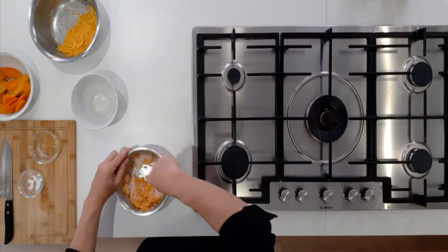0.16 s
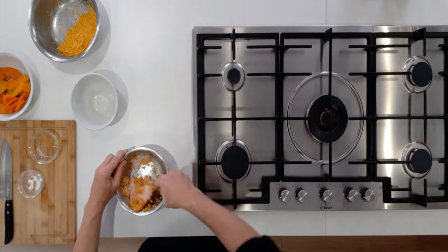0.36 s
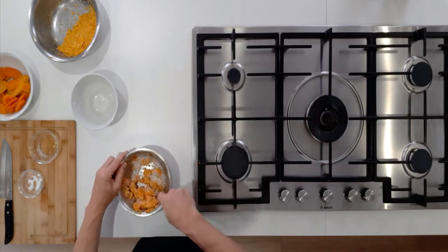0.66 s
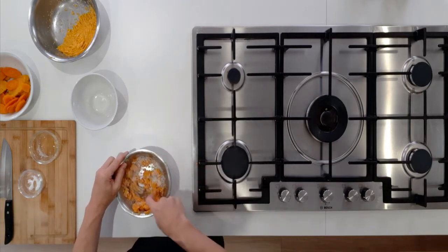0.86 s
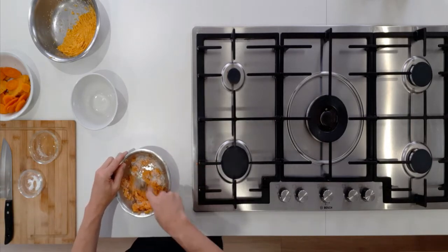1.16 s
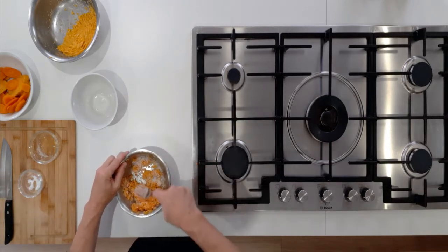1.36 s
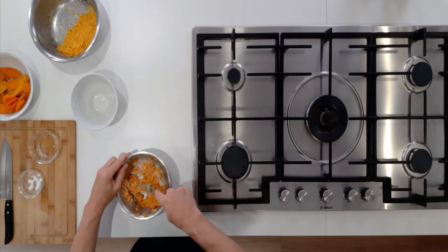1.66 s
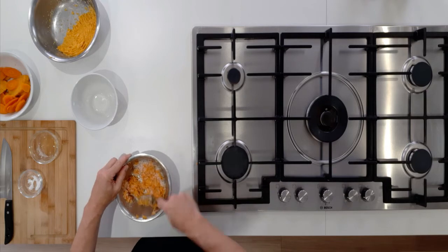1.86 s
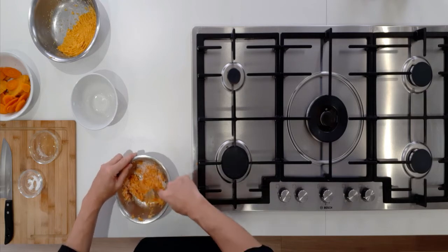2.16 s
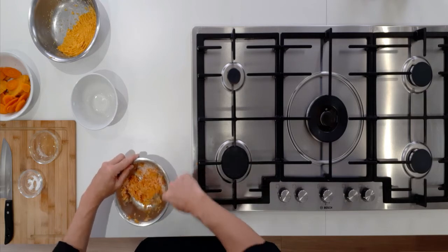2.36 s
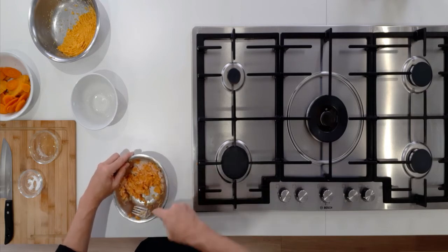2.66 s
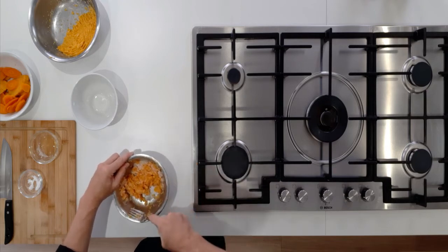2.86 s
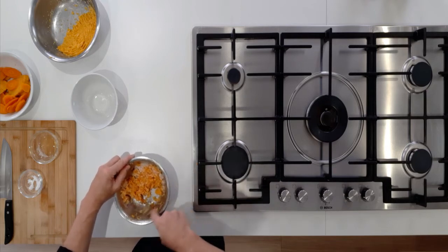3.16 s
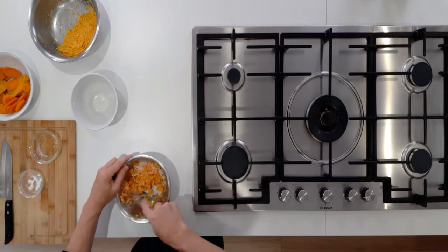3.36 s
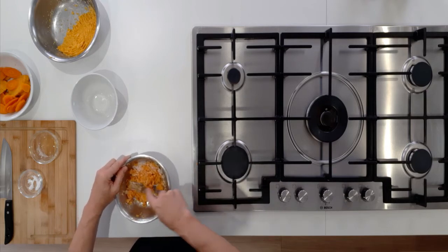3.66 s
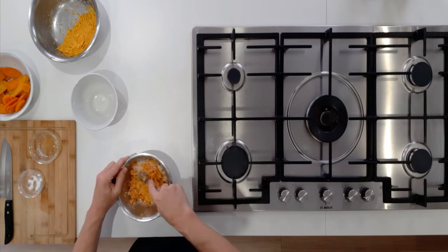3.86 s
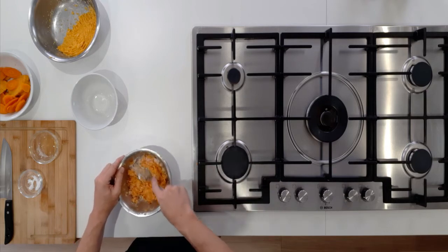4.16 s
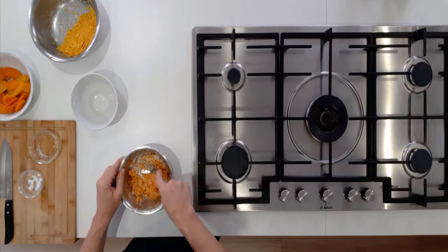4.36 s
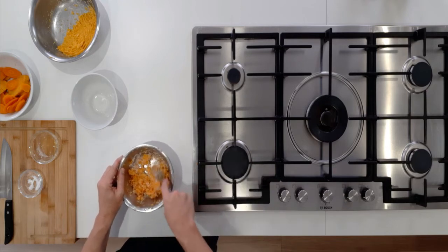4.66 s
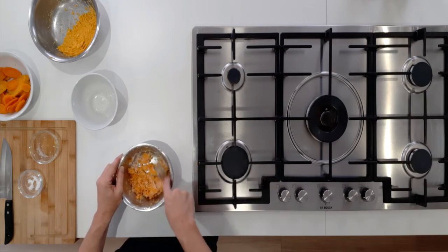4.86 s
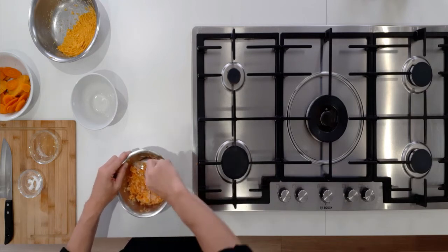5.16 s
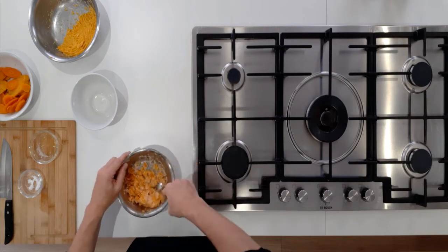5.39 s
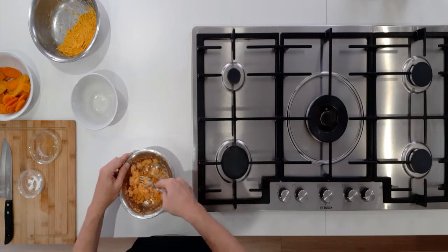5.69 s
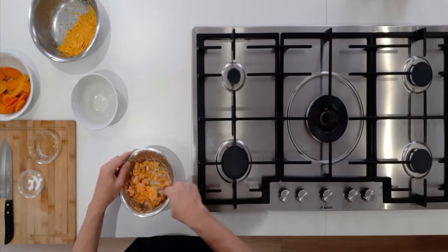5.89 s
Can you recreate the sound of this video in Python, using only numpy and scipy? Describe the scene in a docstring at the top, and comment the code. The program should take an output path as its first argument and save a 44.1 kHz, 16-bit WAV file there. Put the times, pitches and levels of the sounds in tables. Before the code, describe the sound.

Uneven clacks of a fork against a metal bowl as soft mash is mixed, with small wet smacks and light kitchen echo.

```python
"""A fork works soft vegetable mash in a hand-held steel bowl on the counter of a bare, live kitchen.
A faint rub leads into a hard knock on the wall, damped by mash and hand; the hardest comes at 2.1 s.
Lighter knocks follow, about four a second; the tines rub and squeak, the mash squelches and smacks.
Near 5.3 s come a quick cluster of knocks and a longer smear, at 5.9 s a last soft tap.
Throughout, the counter rumbles faintly and the room answers every knock."""
import sys
import numpy as np
from scipy import signal
from scipy.fft import rfft, irfft, next_fast_len
from scipy.io import wavfile
from scipy.ndimage import uniform_filter1d, minimum_filter1d

SR = 44100
rng = np.random.default_rng(int(sys.argv[2]) if len(sys.argv) > 2 else 0)


def output_pcm(signal):
    """Save a mono or channel-first signal as 16-bit PCM at the path in sys.argv[1].

    Samples are clipped to [-1, 1] before scaling.
    """
    pcm = np.clip(np.atleast_2d(signal).T, -1, 1) * 32767
    wavfile.write(sys.argv[1], SR, np.round(pcm).astype(np.int16))


N = 265781
T = np.arange(N) / SR

# fork blows: start_s, strength_db, thud_db, edge_db, tick_db, bare_steel_db, chatter_s, hollow_hz,
# hollow_db, clink1_hz, clink1_db, clink2_hz, clink2_db (hollow and clinks relative to the clack)
KNOCKS = [(0.167,1.5,-4.5,0,-12.5,-4,0.0011,376,-17.5,1678,-9.5,3130,-34),
          (.602,-22,6.5,-0.5,0.5,-3,0.00054,447,-6.5,1580,-7,7900,-13),
          (0.732,-34.5,-4,-0.5,-7,-14,.002,483,-23,1800,-2.5,5800,-25),
          (0.9245,-21.5,8.5,6,4,-4,0.00055,455,-4.5,6470,-32,2450,-11.5),
          (1.2136,-15,-4.5,-7.5,-10.5,-8.5,0.0004,425,-6.5,1600,-14,1310,-25),
          (1.577,-6,3,4,-12,-1,0.00099,448,-8.5,2990,-9,3755,-12),
          (1.8904,-12.5,5.5,4,-0.5,-2.5,0.00085,433,-6,910,-2,1233,-3),
          (1.916,-21.5,-9,-1,-6,-7,0.0042,474,-23,1580,-2,1216,-1),
          (2.129,4.5,-2,-1,-9,1,0.0032,439,-13.5,687,-14,3000,-15),
          (2.1362,-1,-4,3.5,-17.5,2,0.0025,410,-25,2996,-1,4150,-19),
          (2.3898,-8,13,2,2.5,-1.5,0.0021,445,-9.5,1090,-5,804,-19),
          (2.4361,-10.5,3,-4,-10,1,0.00069,467,-13.5,1590,-4.5,1080,-11),
          (2.9385,-33,-9,0.5,3,-6,0.00086,440,-11,2600,-5,10200,-4),
          (2.95,-22.5,2.5,-9,-3,2,0.0012,442,-8.5,3080,-1.5,2180,-7),
          (2.994,-23,-7.5,3,-10.5,1,0.0011,460,-18,2980,-3.5,2250,-4.5),
          (3.1898,-15.5,5,2,-3,-3,0.0017,433,-9,1340,-1,6200,-7),
          (3.2545,-12.5,-2,5.5,-5,-9.5,0.0017,457,-17,1764,-6,3330,-4.5),
          (3.4148,-16,4,-2,-6.5,-2,0.0032,410,-9.5,1066,-8,806,-25),
          (3.6713,-8,6,-1.5,-9,-5,0.004,396,-15,860,-11.5,2100,-13),
          (3.9489,-22,-2,-2.5,-6,-11,0.00028,452,-11,1610,-3,2980,-14),
          (4.17,-15.5,8.5,-5,-1,-4,0.00089,462,-4,934,-5.5,2160,-11),
          (4.4116,-15.5,5.5,-4.5,-4,-1.5,0.00017,469,-2.5,920,-1,637,-10),
          (4.6285,-13,11.5,3.5,1,-3.5,0.0013,453,-2.5,1040,-6.5,5710,-10),
          (4.851,-16,10,-1,-2.5,2,0.002,436,-7.5,735,-12.5,1090,-22),
          (4.9159,-24,1,3,-8.5,-3,0.00085,487,-15,1320,-13,3770,-17),
          (5.162,-28,-3,-1,-4.5,-1,0.0013,462,-10,7700,-3.5,8140,-4),
          (5.2972,-6.5,-6.5,-8,-13.5,-4.5,0.00026,456,-17,915,-2,1294,-4),
          (5.313,-22,-14,2,12,7,.0025,453,-20,1738,-13,5090,1),
          (5.334,-20.5,-1,-3,2,3,0.002,450,-14,1410,-2,4600,-3),
          (5.384,-20.5,8,-0.5,-6.5,0,0.0037,488,-10,960,-10,1520,-9),
          (5.925,-33.5,1.5,-5,-6,2.5,0.0037,510,-30,3150,0.5,1570,-8)]
# modes of the damped bowl: pitch_hz, level_db, t60_s
BOWL_MODES = [(676,-9.5,.025), (884,-4.5,0.074), (1065,-6,0.053), (1302,-2.5,0.025), (1507,4,0.034),
              (1695,1,0.034), (1838,-3,0.047), (2156,-12.5,0.051), (2423,-6.5,0.041), (2873,-12,0.039),
              (2914,-2,0.075), (3560,-7.5,0.065), (3560,-8.5,0.022), (4003,-9,0.052), (5084,-4.5,0.048),
              (5520,-6,0.018), (6080,-5.5,.05), (7160,-9,0.024), (7070,-13.5,0.036), (7870,-9,0.068),
              (9030,-5,0.017), (10100,-11.5,0.03), (10430,-5.5,0.021)]
# tines rubbing on steel: centre_s, half_length_s, level_db, resonance_hz
RUBS = [(.01, 0.028, -57, 1000), (0.084, 0.022, -66, 1190), (2.536, 0.007, -60, 1674),
        (4.854, 0.0025, -56, 1155), (5.089, 0.0066, -66, 950), (5.275, 0.024, -67, 1300),
        (5.321, 0.022, -66, 1100), (5.365, 0.058, -61, 1400), (5.671, 0.013, -72, 920),
        (5.73, 0.0043, -72, 950)]


def knocks(gain_db=-0.5, ring_db=1.0, hollow_t60_s=0.05, clink_t60_s=0.026):
    """Each blow: a clack, the bottom's hollow note and two wall clinks, tuned by spot and mash."""
    radiation = [(40, -36), (130, -15), (250, -8), (450, -11.5), (700, -10), (950, -11), (1700, -7),
                 (3300, -2), (6000, 1), (11000, 1.5)]  # a small bowl radiates little bass: freq_hz, gain_db
    out = np.zeros(N)
    for (start_s, strength_db, thud_db, edge_db, tick_db, bare_steel_db, chatter_s,
         hollow_hz, hollow_db, clink1_hz, clink1_db, clink2_hz, clink2_db) in KNOCKS:
        blow = clack(thud_db, edge_db, tick_db, ring_db + bare_steel_db, chatter_s)
        hollow = undb(hollow_db) * note(hollow_hz, hollow_t60_s)
        clink1 = undb(clink1_db) * note(clink1_hz, clink_t60_s)
        clink2 = undb(clink2_db) * note(clink2_hz, clink_t60_s)
        add(out, start_s, undb(strength_db + gain_db) * unit(blow + hollow - clink1 + clink2))
    return colour(out, radiation)


def clack(thud_db, edge_db, tick_db, ring_db, chatter_s, base_t60_s=0.021, scatter_db=2.0, size=16384):
    """Noisy part of a blow, energy 1: the tines land and chatter, all bowl modes answer."""
    dense_spectrum = [(30,-46), (100,-25.5), (190,-21), (270,-8), (400,-19), (540,1), (680,1), (950,1),
                      (1700,0), (2100,-2.5), (3500,-2), (4100,-7.5), (4550,-8), (6000,-4), (7800,-3),
                      (9200,-9.5), (10800,-5.5), (15500,-20.5)]  # dense, quickly damped modes of bowl and fork: freq_hz, gain_db
    t = T[:size]
    # uneven mash load splits each mode into a pair, differently at every blow
    hz, db, t60_s = np.repeat(BOWL_MODES, 2, axis=0).T
    scatter, load = rng.standard_normal((2, len(hz)))
    modes = np.cos(2 * np.pi * np.outer(hz * (1 + 0.012 * load), t)) * fade(t, t60_s[:, None])
    ring = (rng.choice([-1, 1], len(hz)) * undb(db + scatter_db * scatter)) @ modes
    dense_t60_s = base_t60_s * undb(0.35 * ring_db)  # more mash on the steel, shorter clack
    dense = flatten(rng.standard_normal(size) * fade(t, dense_t60_s), width_hz=230)
    response = unit(colour(dense, dense_spectrum)) + undb(ring_db) * unit(ring)
    chatter = unit(rng.standard_normal(size) ** 3 * np.exp(-t / chatter_s))
    chatter = unit(colour(chatter, [(300, -17.5), (2000, 14.5)]))
    contact = flatten(signal.unit_impulse(size) + undb(-1) * chatter, width_hz=320)
    blow = signal.fftconvolve(contact, response)[:size]
    # mash under the tines thuds, bare steel ticks
    return unit(colour(blow, [(840, thud_db), (1610, 0), (2470, edge_db), (6070, tick_db)]))


def pings(split=0.01, t60_s=0.16):
    """Steel free of hand and mash rings longer, in close mode pairs that beat."""
    free_modes = [(1.577, 5170, -34), (2.1293, 5180, -22), (2.13, 4050, -16.5), (2.1293, 3490, -17.5),
                  (2.389, 6050, -29), (2.995, 5130, -47.5), (3.1894, 10450, -40), (4.6267, 5440, -36),
                  (4.855, 5840, -35), (5.2975, 3020, -29)]  # ringing after a blow: start_s, pitch_hz, level_db
    out = np.zeros(N)
    for start_s, hz, db in free_modes:
        add(out, start_s, undb(db) * unit(note(hz, t60_s) + note(hz * (1 + split), t60_s)))
    return out


def rubs(slips_per_s=6000, broad_db=-18, steel_db=-12, q=1.77, gain_db=1.0):
    """Uneven tine slips drive the wall near one resonance and ring the bowl modes."""
    slip_hz_db = [(40, -36.5), (150, 1), (400, -9.5), (1600, -18.5), (3000, -4), (5000, 0.5),
                  (14000, 2.5)]
    slips = steady(grains(slips_per_s, spread_db=1.5), slip_hz_db)
    steel = np.zeros(N)
    for hz, db, t60_s in BOWL_MODES:
        mode_q = np.pi * hz * t60_s / np.log(1000)
        steel += undb(db) * t60_s * signal.lfilter(*signal.iirpeak(hz, mode_q, SR), slips)
    steel = unit_rms(steel)
    out = np.zeros(N)
    for centre_s, half_s, db, hz in RUBS:
        peak = signal.iirpeak(hz, q, SR)
        wall = unit_rms(signal.lfilter(*peak, signal.lfilter(*peak, slips)))
        friction = wall + undb(broad_db) * slips + undb(steel_db) * steel
        out += undb(db + gain_db) * swell(centre_s, half_s) * friction
    return out


def squeaks(jitter=0.51, overtone_db=-22, grip_db=4):
    """A tine briefly sticks and slips almost regularly, with uneven grip."""
    glides = [(2.432, 0.023, 1603, 1656, -54.5), (4.186, 0.014, 1575, 1880, -51.5),
              (4.857, 0.0246, 1302, 1778, -52.5)]  # tine squeaks: start_s, length_s, start_hz, end_hz, level_db
    out = np.zeros(N)
    grip = undb(grip_db * wander(per_s=400))
    for start_s, length_s, start_hz, end_hz, db in glides:
        n = int(length_s * SR)
        hz = np.linspace(start_hz, end_hz, n) * (1 + jitter * rng.standard_normal(n))
        phase = 2 * np.pi * np.cumsum(hz) / SR
        tone = np.sin(phase) + undb(overtone_db) * np.sin(2 * phase)
        add(out, start_s, undb(db) * signal.windows.tukey(n, 0.5) * tone)
    return out * grip


def squelches(pops_per_s=1800, gain_db=-2.5, smear_db=-11, stir_db=-86, patchy_db=4):
    """Mash crackles and smears under the fork, and faintly between presses."""
    presses = [(0.03, 0.016, -65.5, 5530), (0.535, 0.005, -73, 7600), (0.752, 0.0074, -71.5, 4540),
               (0.996, 0.0062, -62, 5600), (2.425, 0.031, -67, 7200), (2.519, 0.0079, -58, 3322),
               (2.541, 0.0092, -59.5, 7050), (3.255, 0.032, -63, 8980), (3.449, 0.012, -63.5, 8400),
               (4.035, 0.009, -65, 7140), (4.254, 0.0073, -60, 3270), (4.291, 0.0045, -66.5, 3380),
               (4.946, 0.016, -62.5, 7000), (5.314, 0.081, -64, 10300), (5.335, 0.023, -64, 6150),
               (5.517, 0.014, -63.5, 7100), (5.687, 0.032, -76.5, 11400), (5.939, 0.018, -76, 3360),
               (5.945, 0.0055, -63, 8800)]  # mash pressed and torn: centre_s, half_length_s, level_db, pop_hz
    smear_spectrum = [(300, 2.5), (1200, 17), (2300, 7.5), (3400, 7), (4600, -20.5), (7800, -21),
                      (12500, -22), (15500, -47)]  # smearing mash: freq_hz, gain_db
    out = np.zeros(N)
    pressure = undb(stir_db + patchy_db * wander(per_s=30))
    for centre_s, half_s, db, hz in presses:
        n = int(6 * half_s * SR)
        burst = pops(n, hz, int(pops_per_s * n / SR)) * signal.windows.gaussian(n, half_s * SR)
        add(out, centre_s - n / SR / 2, undb(db + gain_db) * burst)
        pressure += undb(db + smear_db) * swell(centre_s, half_s)
    return out + pressure * steady(grains(per_s=8000, spread_db=2.5), smear_spectrum)


def pops(n, typical_hz, count, cycles=6, glide=0.046, spread_db=5, pitch_spread=0.23):
    """Tiny wet pockets burst within n samples, each a short rising ping; rms 1."""
    starts = rng.integers(0, n, (count, 1))
    pitch, level = rng.standard_normal((2, count, 1))
    hz = np.clip(typical_hz * np.exp(pitch_spread * pitch), 800, 14000)
    age = T[:256] * hz / cycles  # in decay times
    phase = 2 * np.pi * cycles * age * (1 + glide * (1 - np.exp(-age)))
    pockets = undb(spread_db * level) * np.sqrt(hz) * np.exp(-age) * np.sin(phase)
    places = starts + np.arange(age.shape[1])
    return unit_rms(np.bincount(places.ravel(), pockets.ravel(), n)[:n])


def smacks(t60_s=0.012, size=2048):
    """Wet mash lets go of the steel with a short, bright tick."""
    releases = [(0.186, -34), (2.545, -37.5), (4.0255, -46), (4.0422, -36.5), (4.957, -37), (5.5111, -44),
                (5.549, -41)]  # mash pulling off: start_s, level_db
    tick_spectrum = [(300, -31), (2000, -12), (5000, -8), (7500, -1), (11000, -5.5), (15500, -5)]  # wet tick: freq_hz, gain_db
    out = np.zeros(N)
    for start_s, db in releases:
        burst = rng.standard_normal(size) * fade(T[:size], t60_s)
        add(out, start_s, undb(db) * unit(colour(burst, tick_spectrum)))
    return out


def kitchen(x, build_s=0.014, gap_s=0.0022):
    """Diffuse echo that builds after a short gap; the treble dies first."""
    bands = [(130, 0.95, 12), (270, 0.9, 15), (400, 0.58, 10), (918, 0.58, 6.5), (1526, 0.55, 2.5),
             (2890, 0.58, -4), (7000, 0.52, -6), (14500, 0.39, -4.5)]  # room echo: freq_hz, t60_s, level_db (relative to the direct sound)
    t = T[:SR]
    hz, t60_s, db = np.transpose(bands)
    log_hz = np.log(np.maximum(np.fft.rfftfreq(SR, 1 / SR), 1))
    onset = 1 - np.exp(-np.maximum(t - gap_s, 0) / build_s)
    median_decay = fade(t, np.median(t60_s))
    # many walls and cupboards: no favoured note
    reflections = flatten(rng.standard_normal(SR) * onset * median_decay, width_hz=16)
    undamped = rfft(unit(reflections) / median_decay * np.linalg.norm(onset * median_decay))
    echo = np.zeros(SR)
    for band, band_t60_s, band_db in zip(np.eye(len(hz)), t60_s, db):
        tail = fade(t, band_t60_s) / np.linalg.norm(onset * fade(t, band_t60_s))
        echo += undb(band_db) * tail * irfft(undamped * np.interp(log_hz, np.log(hz), band), SR)
    return signal.oaconvolve(x, echo)[:N]


def counter_rumble(knock_db=-66, db_per_db=0.69, attack_s=0.02, t60_s=0.71, rub_db=-19, hands_db=-88):
    """Knocks and rubs shake the counter; the hands keep up a faint rumble and shift the bowl."""
    shifts = [(1.34, 0.027, -76), (4.072, 0.045, -79)]  # bowl shifting on the counter: centre_s, half_length_s, level_db
    rumble_spectrum = [(25, -19), (60, 11.5), (110, 10.5), (180, 12), (400, -20.5), (1500, -66.5)]  # shaken counter: freq_hz, gain_db
    shake = (1 - np.exp(-T / attack_s)) * fade(T, t60_s)
    shake_power = np.zeros(N)
    for start_s, strength_db, *_ in KNOCKS:
        add(shake_power, start_s, (undb(knock_db + db_per_db * strength_db) * shake) ** 2)
    drag = sum(undb(db + rub_db) * swell(centre_s, half_s) for centre_s, half_s, db, _ in RUBS)
    hands = undb(hands_db + 4 * wander(per_s=48))
    hands += sum(undb(db) * swell(centre_s, half_s) for centre_s, half_s, db in shifts)
    return np.sqrt(shake_power + drag ** 2 + hands ** 2) * steady(rng.standard_normal(N), rumble_spectrum)


def room_air(level_db=-82):
    """Faint, steady hiss of the room."""
    air_spectrum = [(30, -16.5), (200, -4.5), (1000, -5), (4000, -17), (15000, -19)]  # room noise: freq_hz, gain_db
    return undb(level_db) * steady(rng.standard_normal(N), air_spectrum)


def undb(db):
    return 10 ** (np.asarray(db) / 20)


def unit(x):
    """Scale to energy 1."""
    return x / np.sqrt(np.sum(x ** 2) + 1e-30)


def unit_rms(x):
    return unit(x) * np.sqrt(len(x))


def fade(t, t60_s):
    return np.exp(-np.log(1000) * t / t60_s)


def swell(centre_s, half_s):
    return np.exp(-0.5 * ((T - centre_s) / half_s) ** 2)


def add(out, start_s, x):
    i = max(int(start_s * SR), 0)
    out[i:i + len(x)] += x[:max(N - i, 0)]


def note(hz, t60_s, size=16384):
    """One struck mode, energy 1."""
    return unit(np.sin(2 * np.pi * hz * T[:size]) * fade(T[:size], t60_s))


def grains(per_s, spread_db):
    """Random clicks of uneven size."""
    clicks = (rng.random(N) < per_s / SR) * rng.standard_normal(N)
    return clicks * undb(spread_db * rng.standard_normal(N))


def wander(per_s):
    """Random levels joined by ramps; spread near 1."""
    hold = int(SR / per_s)
    steps = np.repeat(rng.standard_normal(N // hold + 1), hold)
    return 1.2 * uniform_filter1d(steps, hold)[:N]


def colour(x, hz_db):
    """Minimum-phase filter through (freq_hz, gain_db) points."""
    n = 2 * next_fast_len(len(x))
    hz, db = np.transpose(hz_db)
    log_hz = np.log(np.maximum(np.fft.rfftfreq(n, 1 / SR), 1))
    cepstrum = irfft(np.log(undb(np.interp(log_hz, np.log(hz), db))))
    cepstrum[1:n // 2] *= 2
    cepstrum[n // 2 + 1:] = 0
    return irfft(rfft(x, n) * np.exp(rfft(cepstrum)))[:len(x)]


def steady(x, hz_db):
    return unit_rms(colour(x, hz_db))


def flatten(x, width_hz):
    """Level spectral peaks and holes wider than width_hz."""
    power = uniform_filter1d(np.abs(rfft(x)) ** 2, max(int(width_hz * len(x) / SR), 1))
    hz = np.fft.rfftfreq(len(x), 1 / SR)
    return colour(x, np.column_stack([hz, -10 * np.log10(np.abs(power) + 1e-12)])[1:])


def scene():
    bowl = knocks() + pings() + rubs() + squeaks() + squelches() + smacks()
    air = room_air()
    return (bowl + kitchen(bowl) + counter_rumble() + air)[None]


def record(dry, ceiling_db=-16, window=128, top_hz=15900):
    """Limiter on the hardest knocks, then a steep low-pass."""
    gain = np.minimum(1, undb(ceiling_db) / (np.abs(dry) + 1e-12))
    gain = uniform_filter1d(minimum_filter1d(gain, window), window)
    return signal.sosfilt(signal.ellip(8, 0.2, 70, top_hz, fs=SR, output="sos"), dry * gain)


dry = scene()
out = record(dry)
output_pcm(out)
```